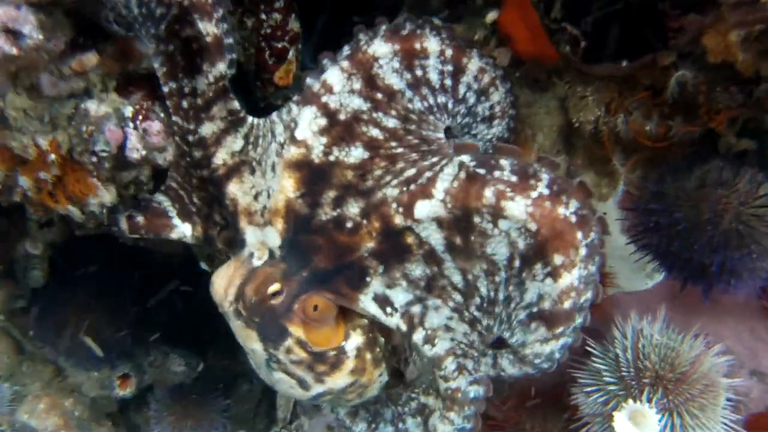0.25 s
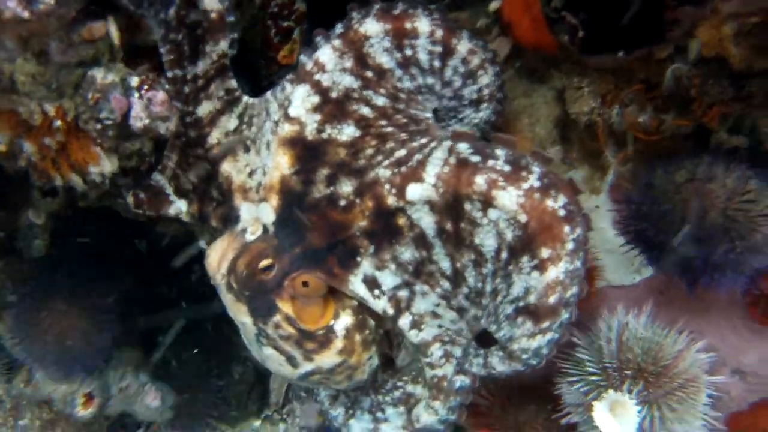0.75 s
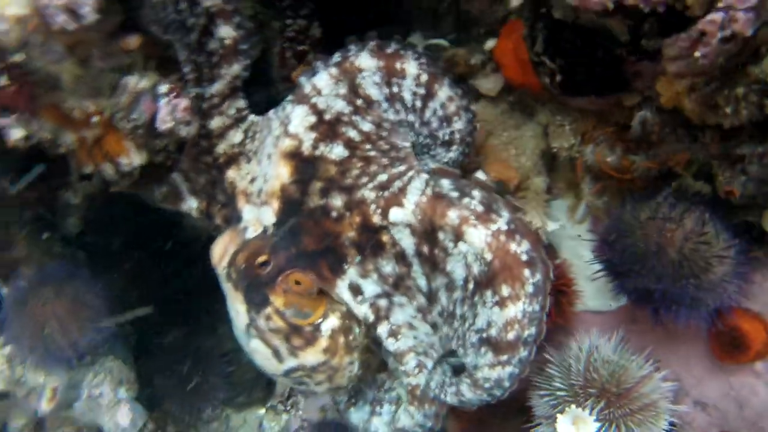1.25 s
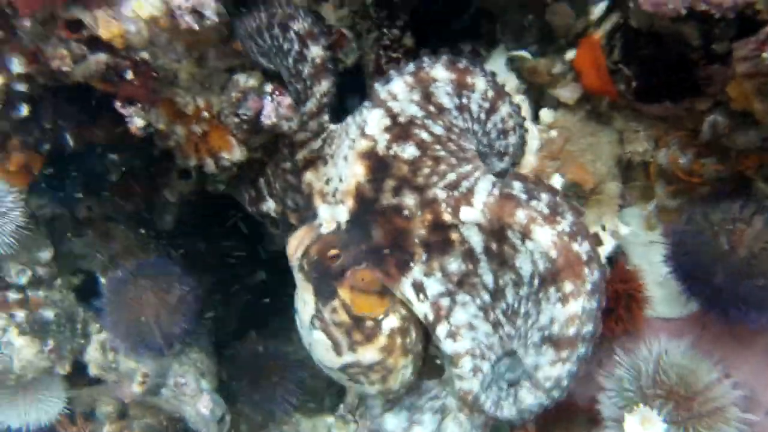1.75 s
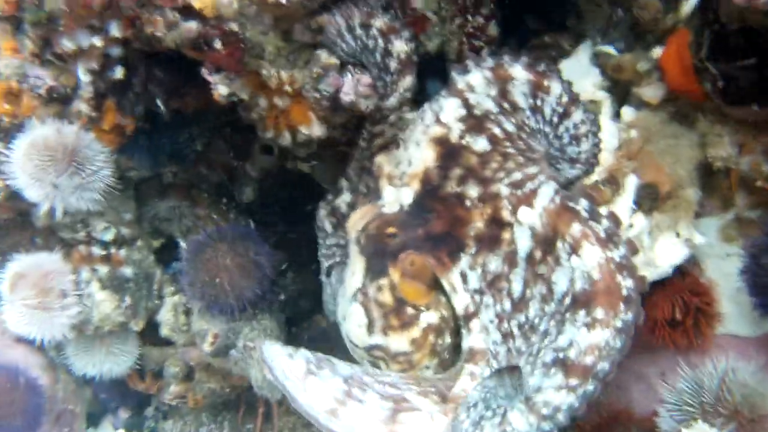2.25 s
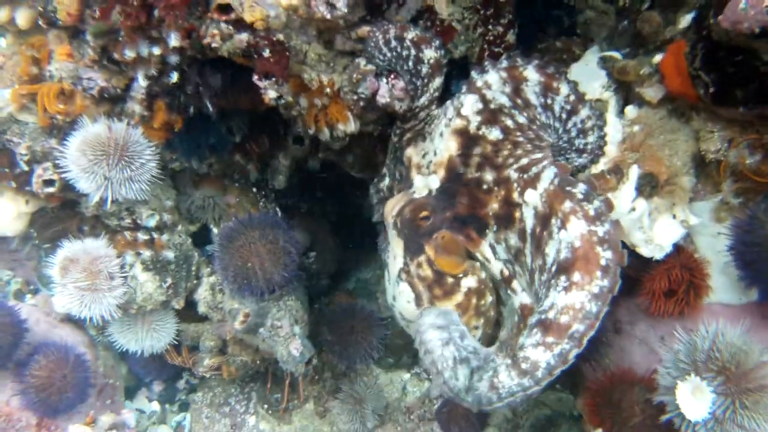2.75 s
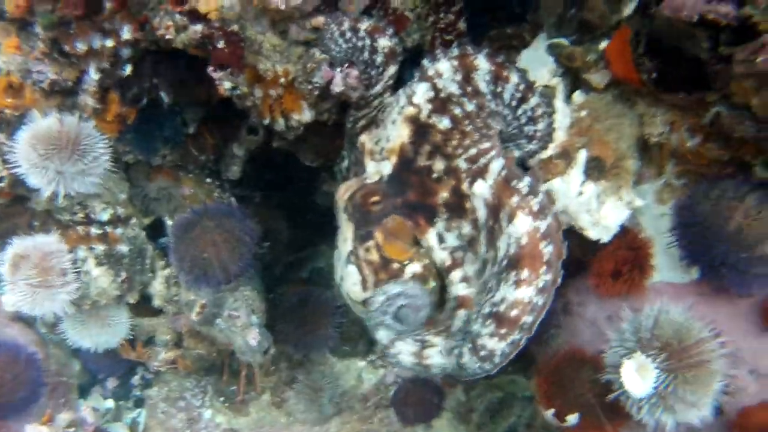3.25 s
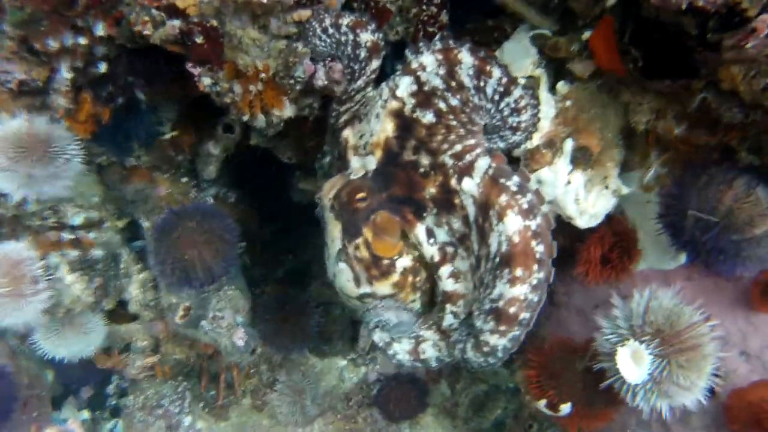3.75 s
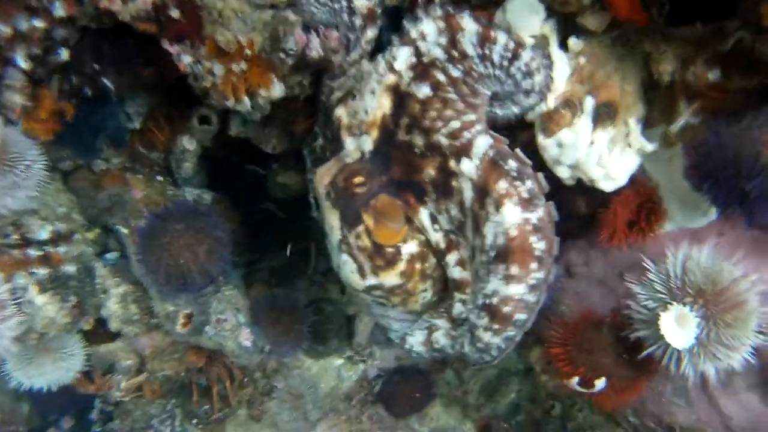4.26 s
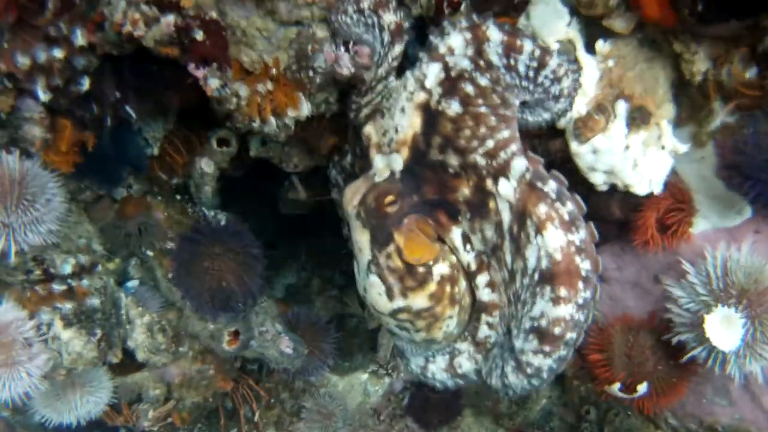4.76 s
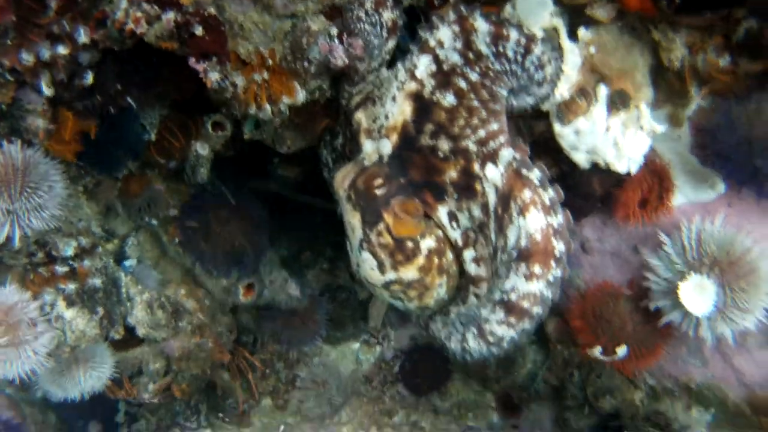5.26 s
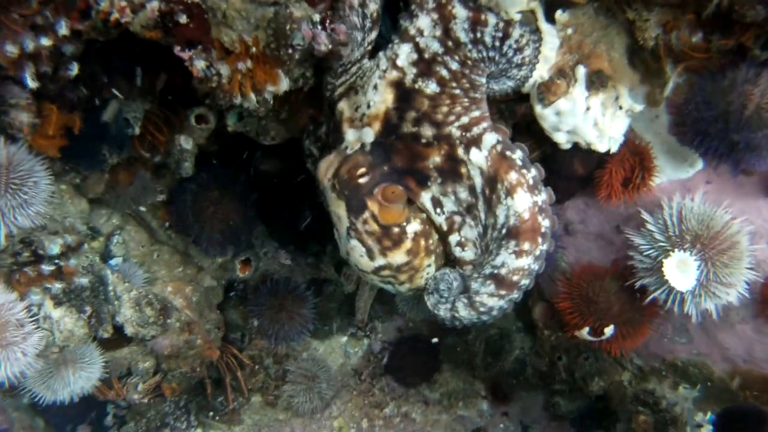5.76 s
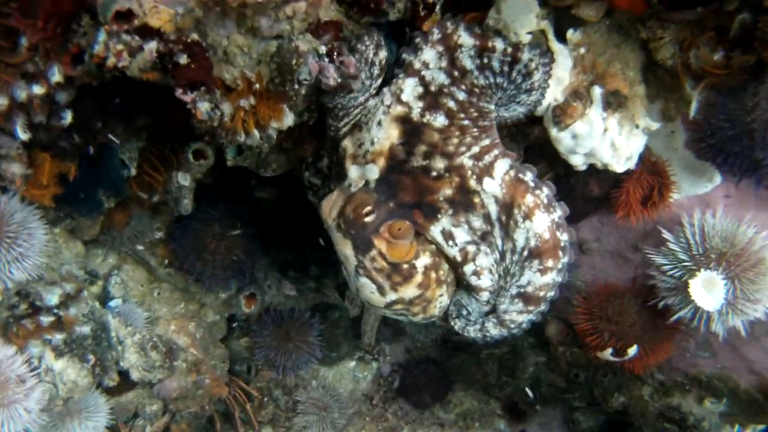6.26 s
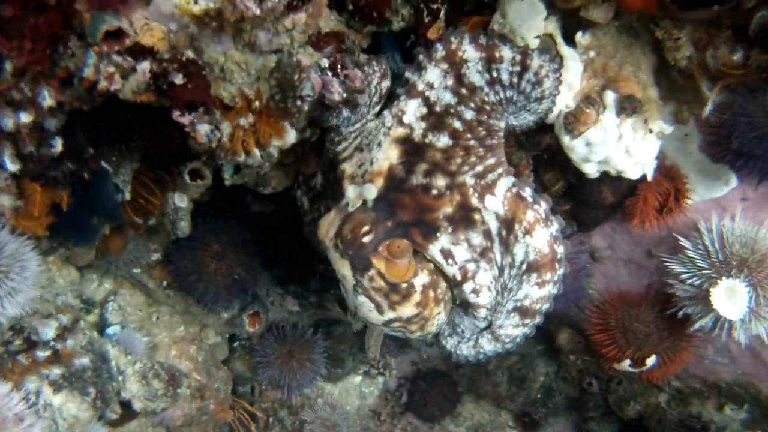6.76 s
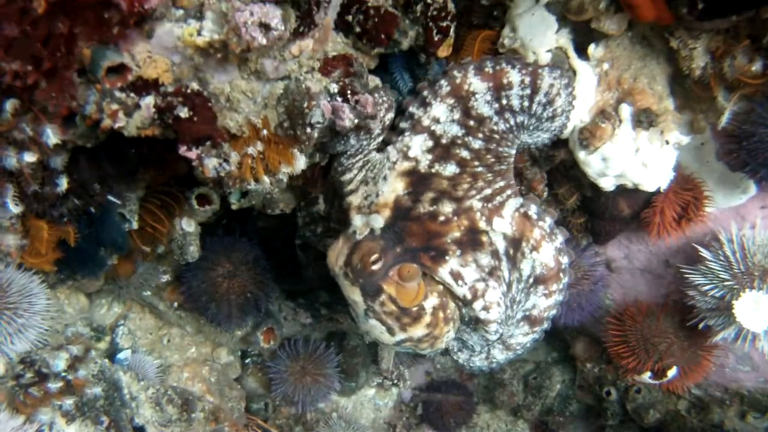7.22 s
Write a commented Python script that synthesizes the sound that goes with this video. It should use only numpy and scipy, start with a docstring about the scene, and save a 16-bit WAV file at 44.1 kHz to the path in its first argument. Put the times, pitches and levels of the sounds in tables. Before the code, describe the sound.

A handled underwater camera housing gives soft bumps, faint squeaks and scattered ticks, with a single loud click over quiet water noise.

```python
"""A camera in a watertight housing drifts over a rocky reef. From the start, moving water rumbles, hands rub,
the reef crackles faintly and the microphone hisses. In the first second or so the grip knocks, squeaks and
creaks, and a shove makes the housing shudder. Sharp clicks ring the shell now and then. From 2.6 to 6.1 s
a hand slides along it; a second shove comes near 4 s, and at 4.9 s the hardest click overloads the
microphone. A few faint clicks, a last shudder and a soft knock end the scene."""
import sys
import numpy as np
from scipy import signal
from scipy.fft import rfft, irfft, next_fast_len
from scipy.io import wavfile
from scipy.ndimage import uniform_filter1d

SR = 44100
rng = np.random.default_rng(int(sys.argv[2]) if len(sys.argv) > 2 else 0)


def file_out(sig):
    """Save sig as 16-bit WAV at sys.argv[1]."""
    # one column per channel
    cols = np.atleast_2d(sig).T
    # limit, then scale
    lim = np.clip(cols, -1, 1)
    pcm = np.round(lim * 32767).astype(np.int16)
    wavfile.write(sys.argv[1], SR, pcm)


N = 330287
TIME = np.arange(N) / SR
RING_SAMPLES = 4096  # room for one short sound to die away

# tone colour of the microphone's hiss, the water's rumble and the hands' rubbing (pitch [Hz], gain [dB])
HISS_COLOUR = [(30, -5.5), (200, 0.5), (400, 4.5), (1000, -0.5), (2000, -4), (3600, -6), (5000, -8),
               (6000, -13)]
RUMBLE_COLOUR = [(10, -13), (22, -4), (32, 0.5), (50, -5), (80, -10.5), (130, -20), (250, -36),
                 (600, -58.5)]
RUBBING_COLOUR = [(40, -11), (80, -1), (150, 0), (260, -2.5), (330, -11.5), (480, -15.5), (700, -20),
                  (1400, -28.5), (3000, -43.5)]
# how strongly water flows past the housing (time [s], level before the rumble's boost [dB])
WATER_FLOW = [(0.0, -64.5), (1.27, -59), (2.0, -65.5), (2.27, -61), (2.69, -63), (2.92, -57), (3.09, -62),
              (4.01, -59.5), (4.63, -59), (5.09, -66), (5.57, -61), (6.57, -66), (7.49, -63.5)]
# how much the hands move on the housing (time [s], rubbing level [dB])
HAND_MOVEMENT = [(0.0, -65.5), (0.94, -62), (1.13, -62.5), (1.92, -67), (4.03, -64.5), (4.17, -62),
                 (5.51, -64.5), (5.8, -59), (6.09, -66), (6.72, -65), (7.09, -64), (7.49, -64)]
# slow slides of a hand along the housing (start [s], end [s], level [dB])
HAND_SLIDES = [(2.6, 4.0, -72.5), (3.8, 4.95, -68), (4.95, 6.1, -74)]
# resonances, the pitches that ring, under a sliding hand (pitch [Hz], width [Hz], gain [dB])
SLIDE_RESONANCES = [(249, 90, 1), (616.5, 120, -0.5), (1140, 400, -7.5), (1960, 510, -7.5),
                    (3440, 450, -16)]
# shoves that shake the housing (start [s], end [s], level [dB])
SHOVE_EVENTS = [(0.92, 1.38, -58), (3.68, 4.36, -59.5), (7.0, 7.6, -63.5)]
# squeaks of the grip (start [s], end [s], level [dB], first pitch [Hz], last pitch [Hz])
SQUEAK_EVENTS = [(0.428, 0.44, -61, 1010, 1060), (0.447, 0.47, -65, 1090, 1010),
                 (0.461, 0.508, -60.5, 960, 825), (0.497, 0.556, -63, 1180, 1007),
                 (0.898, 0.94, -63.5, 1400, 1056), (1.13, 1.154, -59, 917, 940),
                 (1.148, 1.185, -60.5, 814, 668), (1.186, 1.213, -54.5, 760, 1120)]
# creaks of the grip (start [s], end [s], level [dB])
CREAK_EVENTS = [(0.547, 0.616, -56), (0.635, 0.674, -56.5), (0.700, 0.744, -57.5), (0.954, 0.995, -58),
                (1.0125, 1.021, -57)]
# what rings when the grip slips (pitch [Hz], width [Hz], gain [dB])
GRIP_RESONANCES = [(246, 124, -3), (583, 100, -4.5), (888, 130, 2.5), (1100, 120, -5.5), (1550, 210, -17)]
# dull knocks on the housing (time [s], level at the top of the swell [dB], pitch [Hz])
KNOCK_EVENTS = [(0.1445, -36.5, 135), (0.1754, -27.5, 138), (0.388, -44.5, 149), (2.239, -30, 162),
                (2.258, -40.5, 185), (3.152, -48.5, 565), (3.644, -50, 570), (3.7112, -44.5, 660),
                (4.044, -47.5, 660), (4.074, -30, 146), (4.863, -41.5, 196), (4.933, -44, 200),
                (5.083, -46.5, 230), (6.534, -44, 79.5), (7.415, -46, 139)]
# the two parts of a click: the shell's ring and the direct crack (pitch [Hz], width [Hz], gain [dB])
SHELL_RESONANCES = [(679.6, 160, -19), (890, 110, -5.5), (1123, 170, -1), (1236, 100, -5.5),
                    (1633, 280, -8.5), (2120, 430, -9.5), (2500, 370, -3.5), (2700, 320, -2.5),
                    (3350, 340, -3), (3460, 400, -1), (3610, 200, -3.5), (4020, 140, -20.5),
                    (5050, 400, -22.5), (5340, 920, -12.5), (5600, 380, -15)]
CRACK_RESONANCES = [(1730, 220, -3), (2610, 450, 1), (3500, 130, 1), (3890, 440, -3), (4815, 1090, -10)]
# the harder the click, the more the ring outweighs the crack (click level [dB], crack gain [dB])
CRACK_BALANCE = [(-36, 7.5), (-12, -21)]
# sharp clicks on the shell
# (time [s], level over 10 ms [dB], pitch [Hz], fall on each side of that pitch [dB/octave], spread [s])
CLICK_EVENTS = [(0.4866, -60, 4200, 7, .0005), (0.716, -59, 3700, 20, 0.00038),
                (2.033, -60.5, 3300, 17, 0.00045), (2.0595, -60.5, 4250, 7, .0002),
                (2.3431, -56.5, 3710, 24, .0003), (2.8016, -53, 3620, 33, 0.00036),
                (3.094, -38.5, 4200, 9.5, .0016), (3.1114, -54.5, 3600, 1, .0006),
                (3.532, -54.5, 3810, 9, 0.00066), (3.9764, -37, 3030, 10, .0004),
                (4.0435, -45, 2140, 30, 0.00045), (4.8814, -53.5, 2700, 19, .0005),
                (4.933, -10, 3030, 1.8, 0.00063), (5.1166, -54, 4200, 14, .0005),
                (5.663, -61.5, 3200, 5, .0005), (6.6502, -63.5, 3500, 16, .0005),
                (6.8699, -59, 4370, 11.5, 0.00017)]


def undb(db):
    """Turn decibels into a number to multiply by."""
    return 10 ** (np.asarray(db) / 20)


def level(x, db):
    """Scale a sound to an average (rms) level."""
    return x * undb(db) / np.sqrt(np.mean(x ** 2) + 1e-30)


def add(out, start, x):
    """Mix x into out from a start time in seconds."""
    i = max(int(start * SR), 0)
    out[i:i + len(x)] += x[:max(len(out) - i, 0)]


def gain_curve(samples, points):
    """Join (pitch [Hz], gain [dB]) points into a gain for every frequency."""
    hz, db = np.transpose(points)
    f = np.maximum(np.fft.rfftfreq(samples, 1 / SR), 1)
    return undb(np.interp(np.log(f), np.log(hz), db))


def colour(x, points):
    """Turn the lows and highs of a sound up or down along a gain curve."""
    return irfft(rfft(x) * gain_curve(len(x), points), len(x))


def noise(points):
    """Noise with the given tone colour and an average (rms) size of 1."""
    return level(colour(rng.standard_normal(next_fast_len(N)), points)[:N], 0)


def wander(turns_per_s):
    """A curve that drifts up and down at random, by about 1."""
    step = int(SR / turns_per_s)
    stairs = np.repeat(rng.standard_normal(N // step + 1), step)
    return level(uniform_filter1d(stairs, step)[:N], 0)


def strokes(rows, fade_s):
    """A loudness curve that rises, holds and falls for each (start [s], end [s], level [dB])."""
    return sum(undb(db) * np.clip(np.minimum(TIME - start, end - TIME) / fade_s, 0, 1)
               for start, end, db in rows)


def ring(resonances, tilt=((1, 0), (2, 0))):
    """How an object with these resonances rings after one tap; tilt is an extra gain curve."""
    f = np.maximum(np.fft.rfftfreq(RING_SAMPLES, 1 / SR), 1)
    power = sum((undb(db) / (1 + (2 * (f - hz) / width) ** 2)) ** 2 for hz, width, db in resonances)
    cepstrum = irfft(np.log(np.sqrt(power) * gain_curve(RING_SAMPLES, tilt)))
    cepstrum[1:RING_SAMPLES // 2] *= 2  # folding one half onto the other puts all ringing after the tap
    cepstrum[RING_SAMPLES // 2 + 1:] = 0
    return irfft(np.exp(rfft(cepstrum)))


def microphone_hiss(db=-63.5):
    """The microphone's own steady noise."""
    return undb(db) * noise(HISS_COLOUR)


def reef(snaps_per_s=60, crackle_db=-78, ring_s=0.0011):
    """Far-off snaps, each with its own pitch, too many and too faint to tell apart."""
    out, t = np.zeros(N), np.arange(RING_SAMPLES) / SR
    for when, weakness, pitch in rng.random((int(snaps_per_s * N / SR), 3)):
        hz = 2000 + 2600 * pitch
        snap = np.exp(-t / ring_s) * np.sin(2 * np.pi * hz * t)
        add(out, when * N / SR, undb(-16 * weakness) * snap)
    return level(out, crackle_db)


def water(boost_db=6, surge_db=1.5):
    """Moving water pushes on the housing and makes a low, surging rumble."""
    flow_db = np.interp(TIME, *np.transpose(WATER_FLOW))
    return noise(RUMBLE_COLOUR) * undb(boost_db + flow_db + surge_db * wander(11))


def rubbing(uneven_db=2.5):
    """The hands shift on the housing in small, uneven rubs."""
    hands_db = np.interp(TIME, *np.transpose(HAND_MOVEMENT))
    return noise(RUBBING_COLOUR) * undb(hands_db + uneven_db * wander(40))


def slide(uneven_db=2, resting_db=-81):
    """A sliding hand's fine friction rings a few broad resonances; a trace stays while it rests."""
    friction = signal.fftconvolve(rng.standard_normal(N), ring(SLIDE_RESONANCES))[:N]
    loudness = undb(resting_db) + strokes(HAND_SLIDES, fade_s=.22)
    return level(friction, 0) * loudness * undb(uneven_db * wander(30))


def shudder(hz=81.6, width_hz=50):
    """Each shove shakes the housing at one low, broad resonance."""
    shake = signal.fftconvolve(rng.standard_normal(N), ring([(hz, width_hz, 0)]))[:N]
    return level(shake, 0) * strokes(SHOVE_EVENTS, fade_s=.15)


def squeaks(roughness=0.39, waver=0.041, overtone_db=-16, overtone_db_per_octave=-22, scrape_db=-10):
    """Very fast slips merge into short, rough, gliding tones; lower ones have stronger overtones."""
    out, wobble, flutter = np.zeros(N), wander(400), wander(350)
    scrape = undb(scrape_db) * noise([(500, -15), (1100, 5), (1600, -4), (2700, -8), (4000, -20)])
    for start, end, db, first_hz, last_hz in SQUEAK_EVENTS:
        span = (TIME >= start) & (TIME < end)
        hz = np.linspace(first_hz, last_hz, span.sum()) * (1 + waver * wobble[span])
        phase = 2 * np.pi * np.cumsum(hz) / SR
        richness = undb(overtone_db + overtone_db_per_octave * np.log2(hz / 1000))
        overtones = sum(np.sin(k * phase) * 2 / k for k in range(2, 5))
        tone = np.sin(phase) + richness * overtones + scrape[span]
        loudness = (1 + roughness * flutter[span]) * signal.windows.tukey(span.sum(), .5)
        out[span] += level(tone * loudness, db)
    return out


def creaks(slips_per_s=132, jitter=0.2, uneven_db=2, first_slip_db=3):
    """The grip sticks and slips; each slip rings briefly, and the first gets an extra push."""
    out, slip = np.zeros(N), ring(GRIP_RESONANCES)
    slip *= np.sqrt(SR / slips_per_s) / np.linalg.norm(slip)  # a run of these is near 0 dB
    for start, end, db in CREAK_EVENTS:
        gap_chance, size_chance = rng.standard_normal((32, 2)).T
        gaps = np.exp(jitter * gap_chance) / slips_per_s
        times = start + np.cumsum(gaps) - gaps[0]
        sizes_db = np.r_[first_slip_db, uneven_db * size_chance[1:]]
        for when, size_db in zip(times, sizes_db):
            if when < end:
                add(out, when, undb(db + size_db) * slip)
    return out


def knock(db, hz, scuff_db=-24):
    """A soft bump on the housing: a few low waves swell and die, with a little scuff at the contact."""
    t = np.arange(RING_SAMPLES) / SR
    swell_s = 0.0044 * (150 / hz) ** 0.27  # higher knocks swell faster
    loudness = (t / swell_s * np.exp(1 - t / swell_s)) ** 2
    scuff = colour(rng.standard_normal(RING_SAMPLES), [(100, -12), (320, 7), (600, -10), (1500, -43)])
    return undb(db) * loudness * (level(scuff, scuff_db) - np.sin(2 * np.pi * hz * t))


def knocks(nudges_per_s=2, nudge_above_rubbing_db=12, nudge_hz=185):
    """The clear knocks, plus small random nudges that get louder as the hands move more."""
    out = np.zeros(N)
    for start, db, hz in KNOCK_EVENTS:
        add(out, start, knock(db, hz))
    for when, size, pitch in rng.uniform(-1, 1, (int(nudges_per_s * N / SR), 3)):
        start = abs(when) * N / SR
        hands_db = np.interp(start, *np.transpose(HAND_MOVEMENT))
        add(out, start, knock(hands_db + nudge_above_rubbing_db + 3 * size, nudge_hz * (1 + .25 * pitch)))
    return out


def scatter(x, spread_s, echo=0.55):
    """Three short paths round the shell smear a click in time without changing its tone colour."""
    spectrum, f = rfft(x), np.fft.rfftfreq(len(x), 1 / SR)
    for share in (.3, .55, 1):
        path_samples = round(spread_s * share * rng.uniform(.9, 1.1) * SR)
        delay = np.exp(-2j * np.pi * f * path_samples / SR)
        spectrum = spectrum * (delay - echo) / (1 - echo * delay)
    return irfft(spectrum)


def click(db, hz, fall_db, spread_s, tail_db=-21, tail_s=0.029):
    """A direct crack plus the shell's ring, both shaped round the click's pitch; a weak tail follows."""
    t = np.arange(RING_SAMPLES) / SR
    crack_db = np.interp(db, *np.transpose(CRACK_BALANCE))
    crack = [(pitch, width, gain_db + crack_db) for pitch, width, gain_db in CRACK_RESONANCES]
    tilt = [(hz / 2, -fall_db), (hz, 0), (hz * 2, -fall_db)]
    snap = scatter(ring(list(SHELL_RESONANCES) + crack, tilt), spread_s)
    tail_shape = undb(-60 * t / tail_s) * (1 - np.exp(-t / 0.0028))
    tail = rng.standard_normal(RING_SAMPLES) * tail_shape
    snap += undb(tail_db) * signal.fftconvolve(snap, tail / np.linalg.norm(tail))[:RING_SAMPLES]
    return undb(db) * snap / np.linalg.norm(snap) * np.sqrt(SR / 100)  # level counted over 10 ms


def clicks():
    """Sharp clicks ring the shell, each at its own moment."""
    out = np.zeros(N)
    for start, db, hz, fall_db, spread_s in CLICK_EVENTS:
        add(out, start, click(db, hz, fall_db, spread_s))
    return out


def scene():
    """The sealed housing gives left and right the same sound, apart from a trace of hiss."""
    housing = clicks() + knocks() + creaks() + squeaks() + slide() + shudder()
    background = water() + rubbing() + reef() + microphone_hiss()
    middle = housing + background
    side_hiss = undb(-77.5) * noise([(30, -28), (100, -8), (250, 0), (5500, 1), (8000, -30)])
    return np.array([middle + side_hiss, middle - side_hiss])


def record(dry, converter_hz=12000, band_hz=5500, top_hz=15300):
    """The camera's converter holds each sample, so the treble is a mirror image of the sound below."""
    band = signal.sosfilt(signal.cheby1(8, .3, band_hz, fs=SR, output="sos"), dry)
    mirrored = band * (1 + 2 * np.cos(2 * np.pi * converter_hz * TIME))
    f = np.fft.rfftfreq(N, 1 / SR)
    held = irfft(rfft(mirrored) * np.sinc(f / converter_hz), N)  # holding weakens the higher images
    overloaded = np.clip(held, -1, 1)  # the hardest click has its peaks cut off
    return signal.sosfilt(signal.ellip(12, .2, 80, top_hz, fs=SR, output="sos"), overloaded)


dry = scene()
out = record(dry)
file_out(out)
```